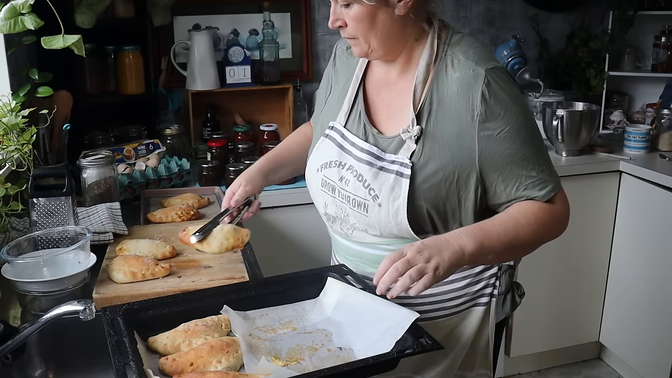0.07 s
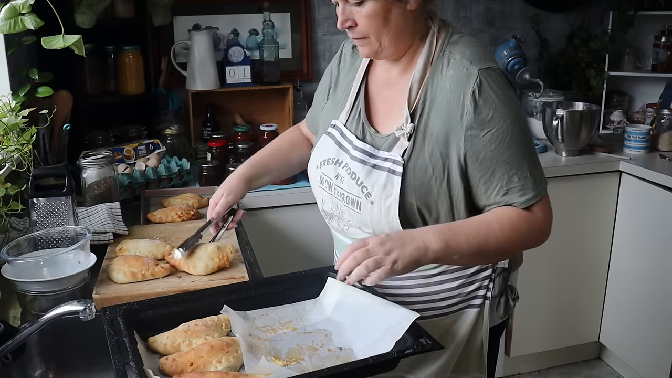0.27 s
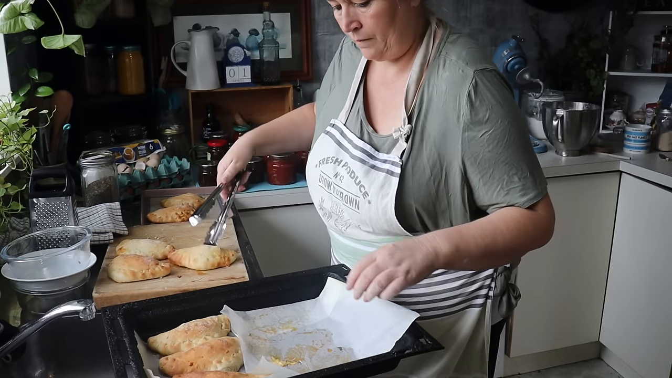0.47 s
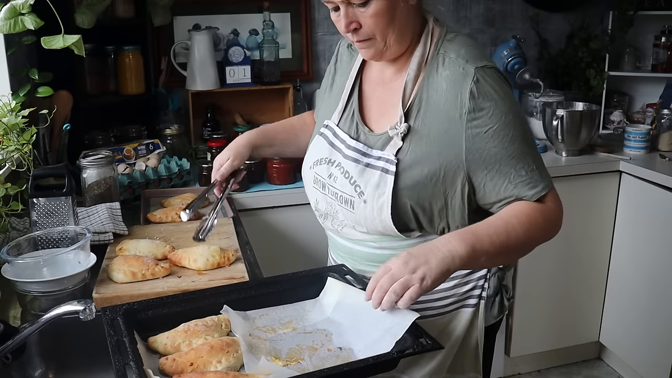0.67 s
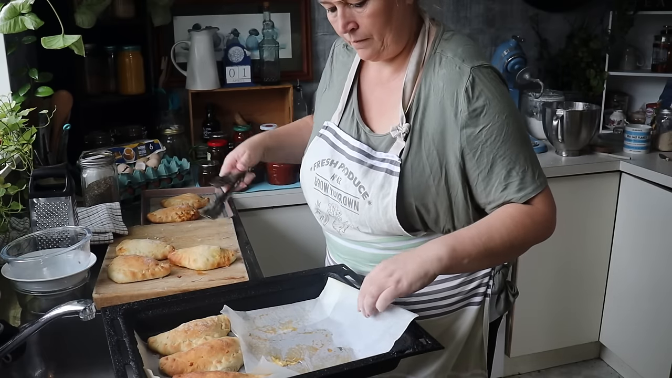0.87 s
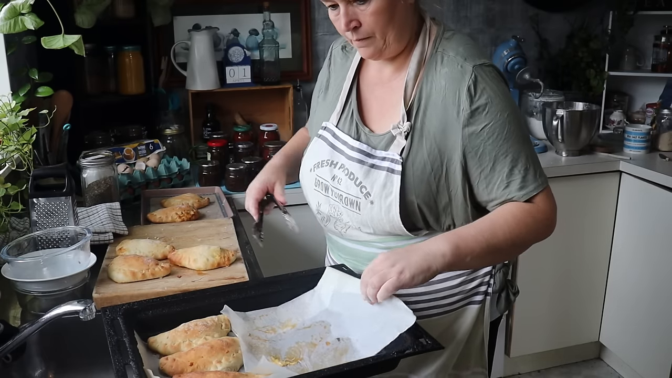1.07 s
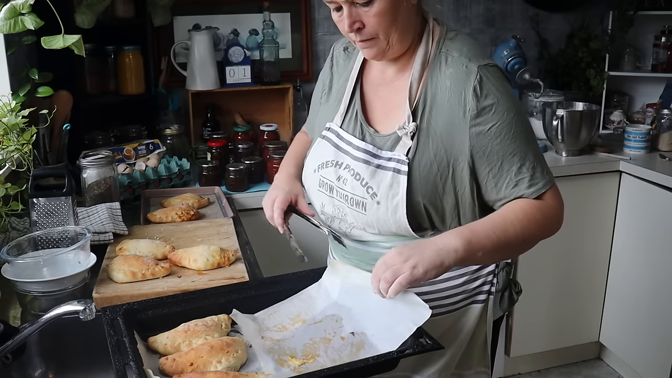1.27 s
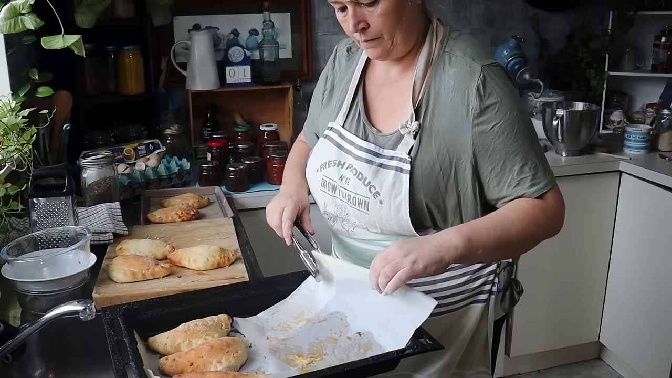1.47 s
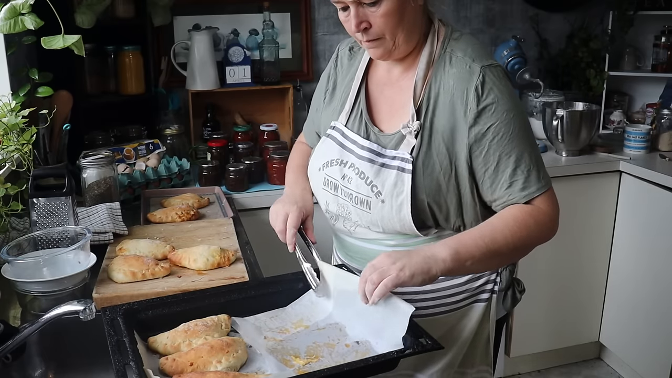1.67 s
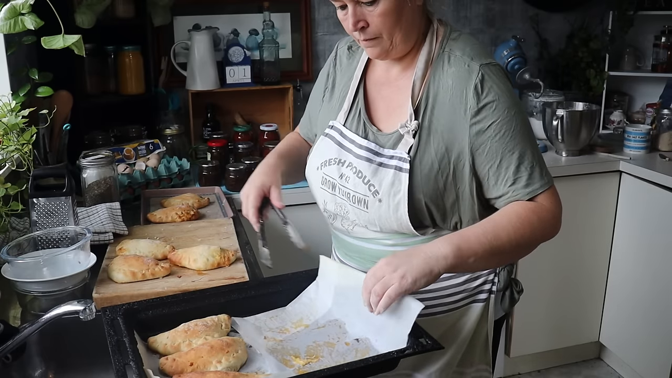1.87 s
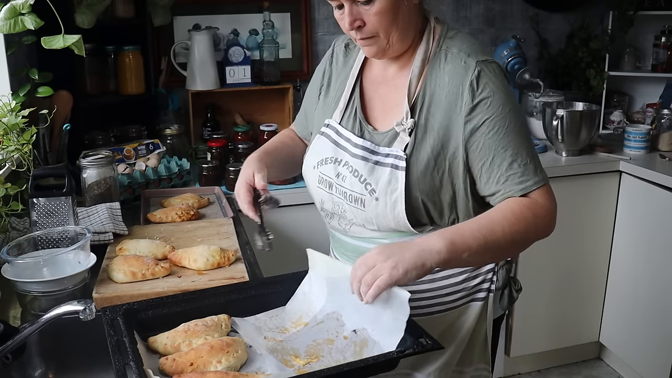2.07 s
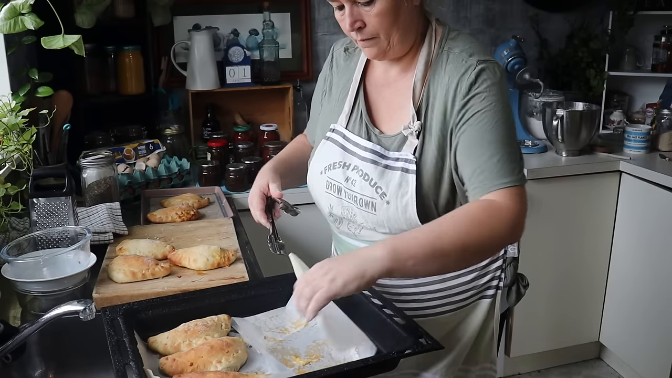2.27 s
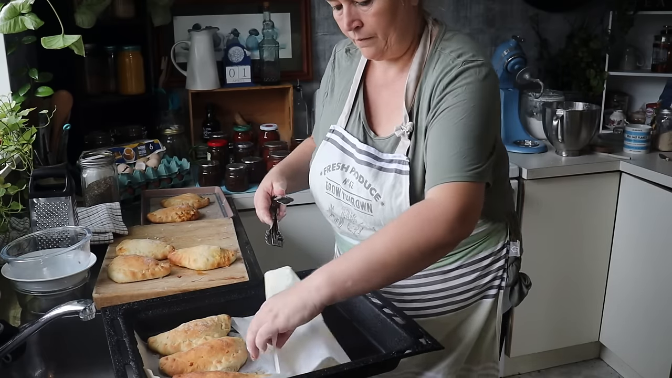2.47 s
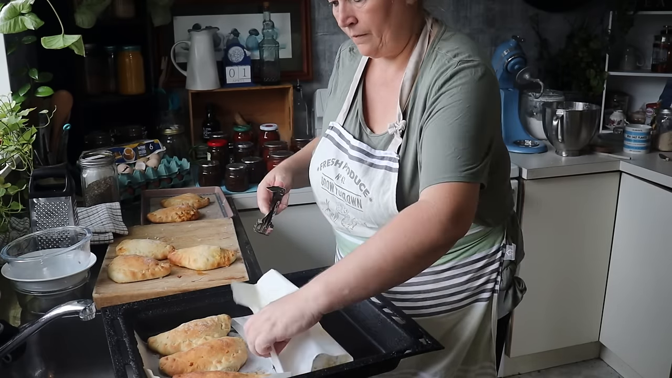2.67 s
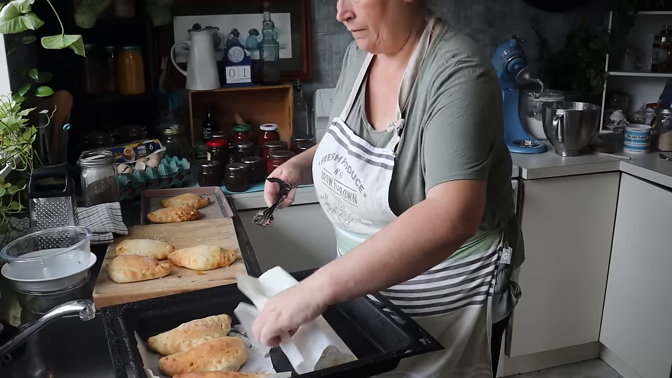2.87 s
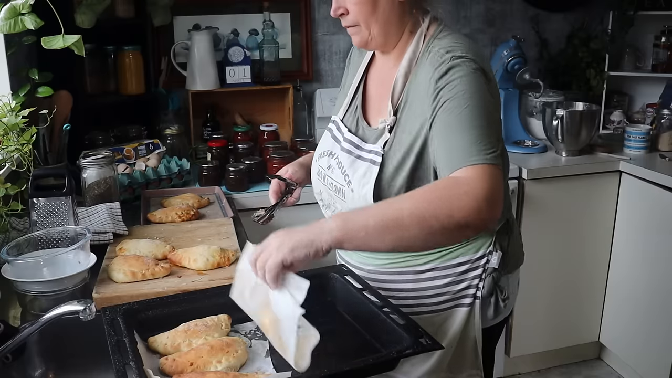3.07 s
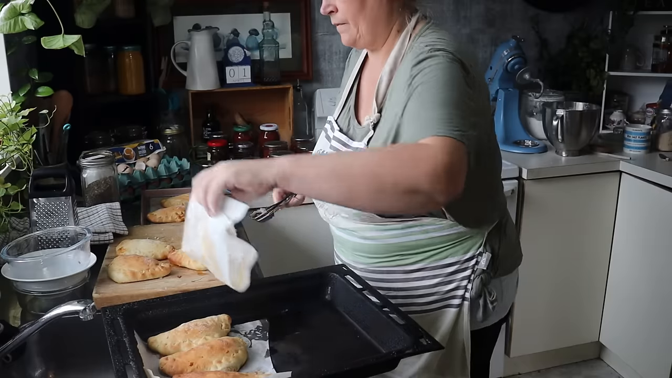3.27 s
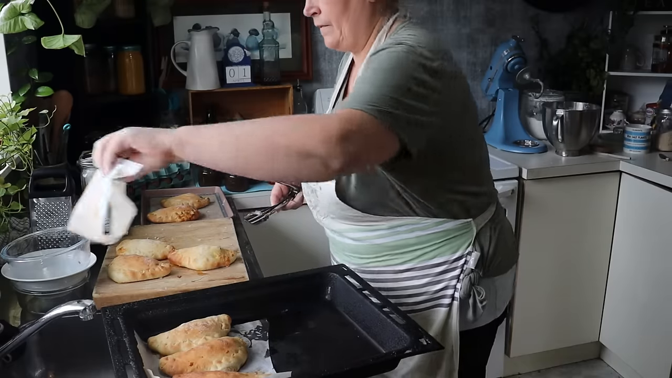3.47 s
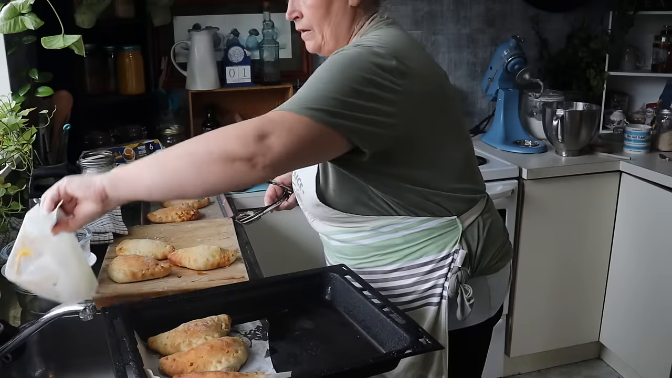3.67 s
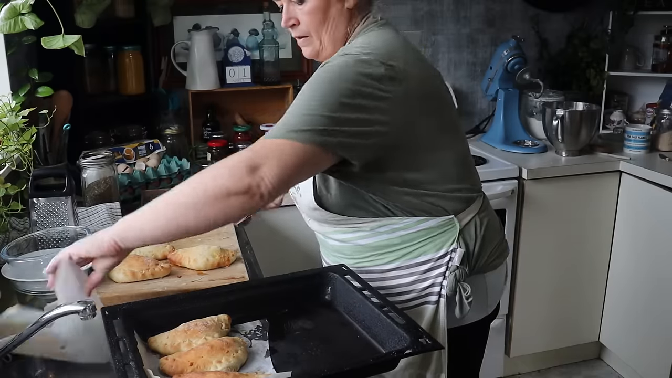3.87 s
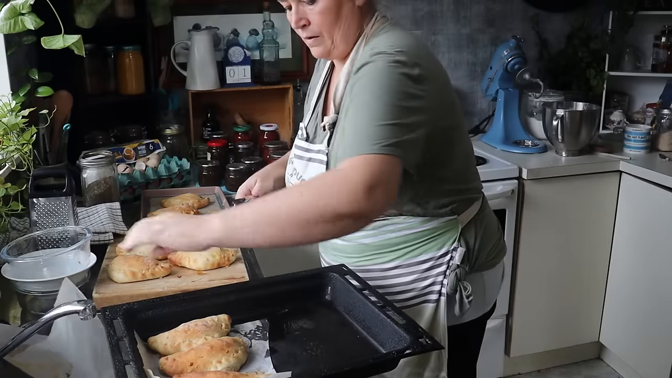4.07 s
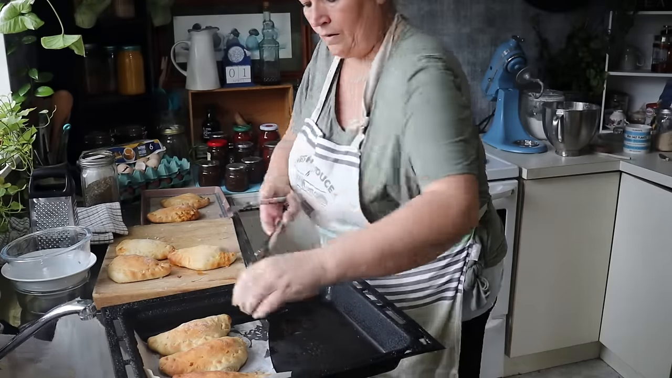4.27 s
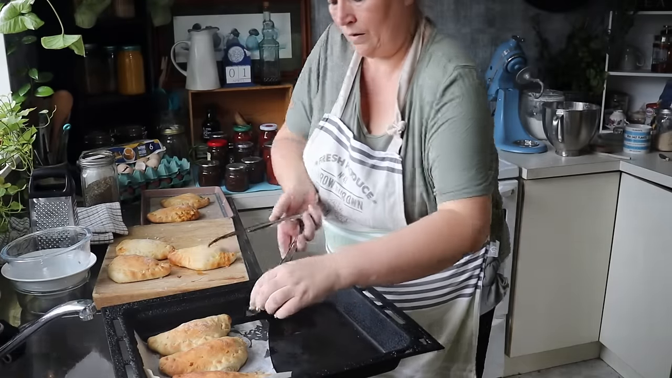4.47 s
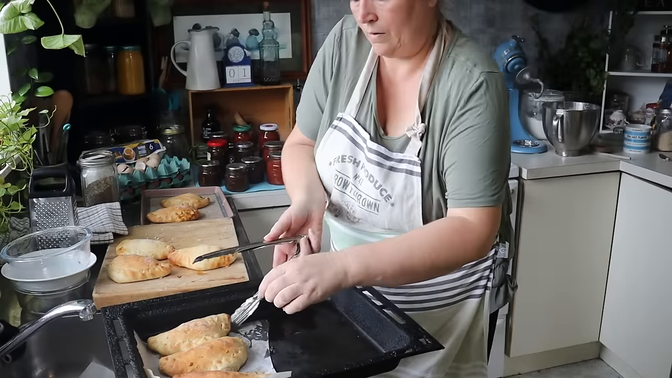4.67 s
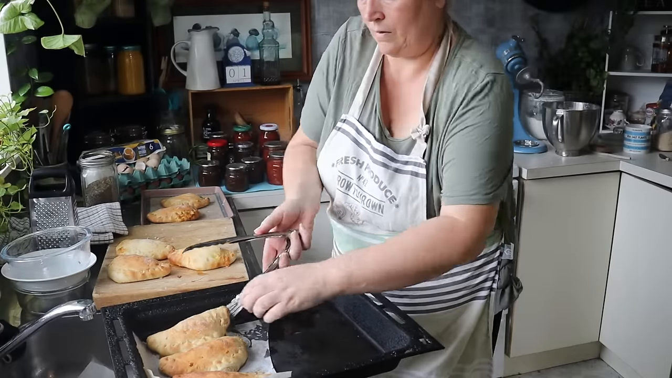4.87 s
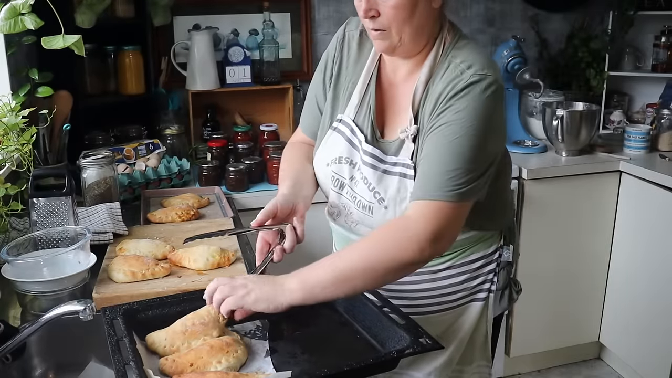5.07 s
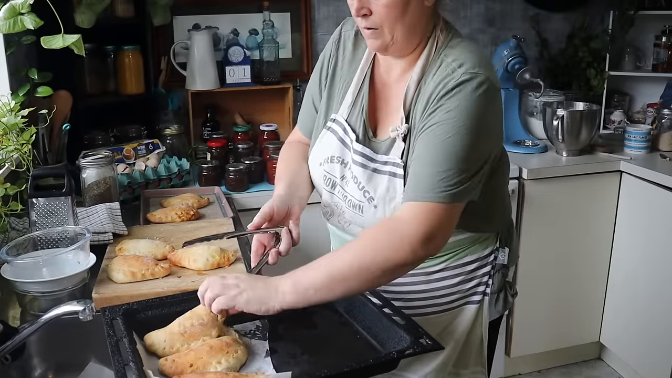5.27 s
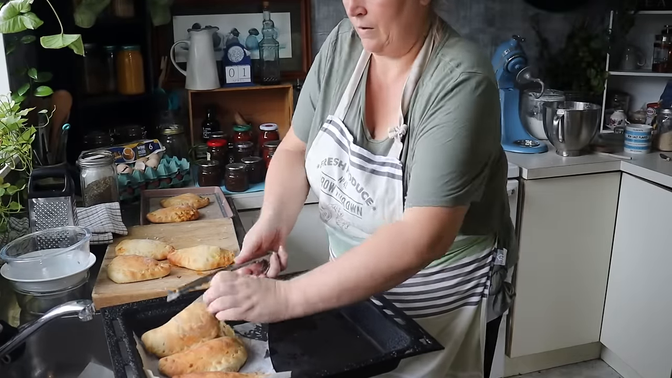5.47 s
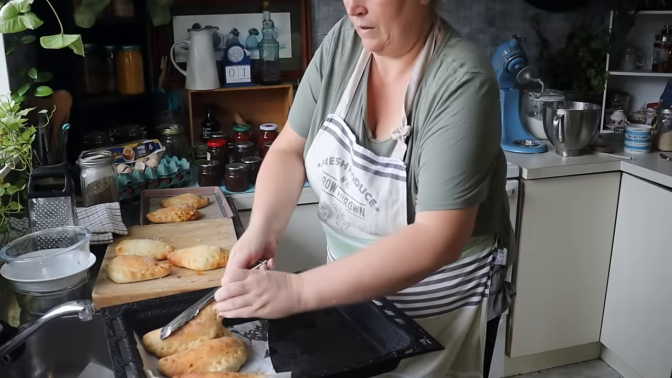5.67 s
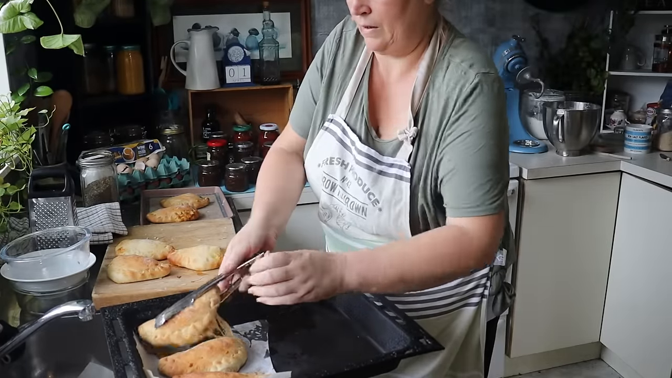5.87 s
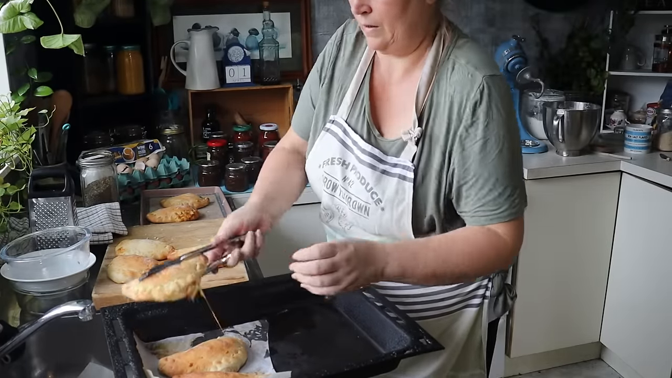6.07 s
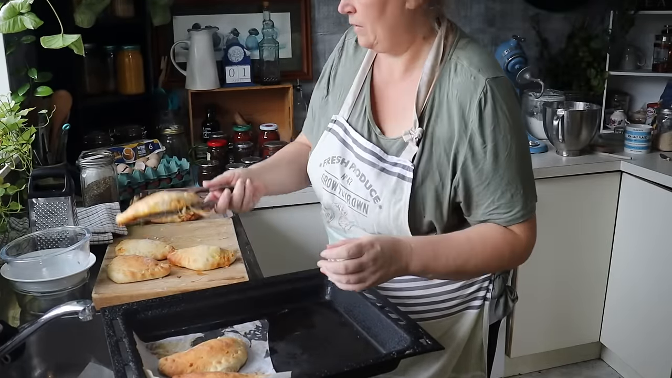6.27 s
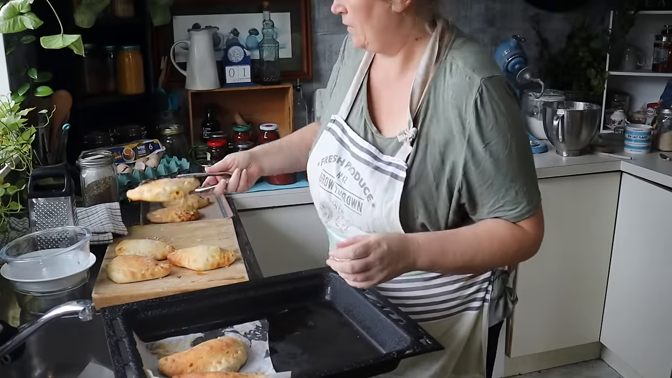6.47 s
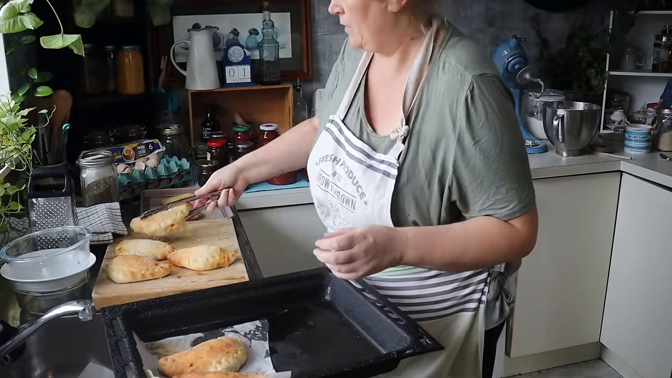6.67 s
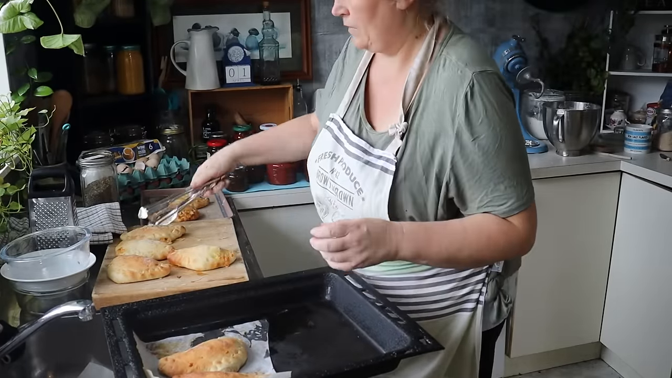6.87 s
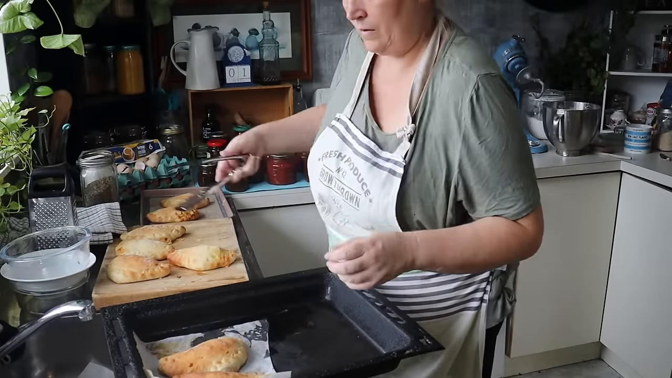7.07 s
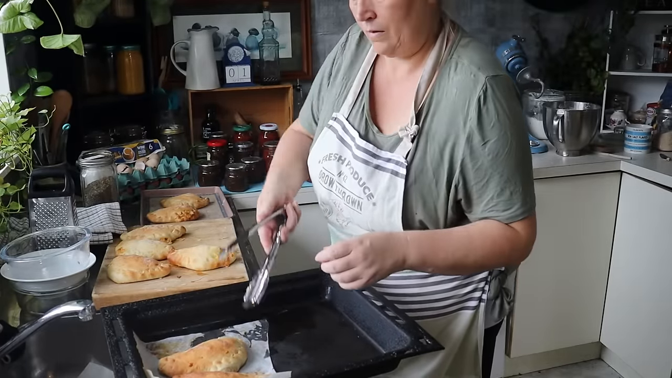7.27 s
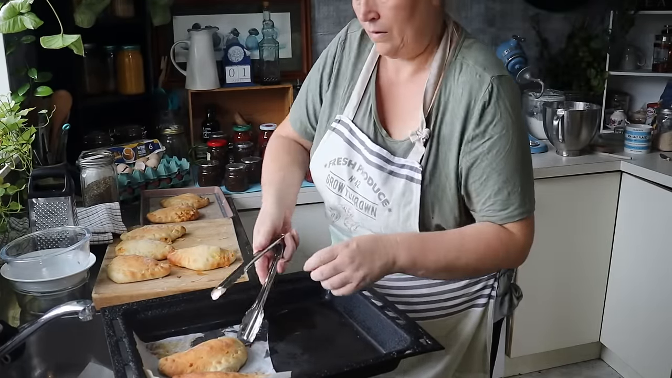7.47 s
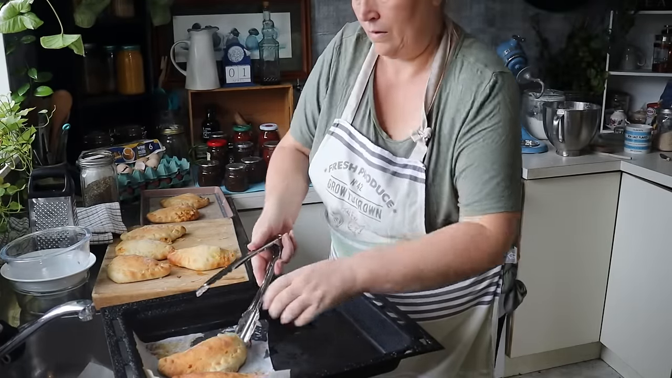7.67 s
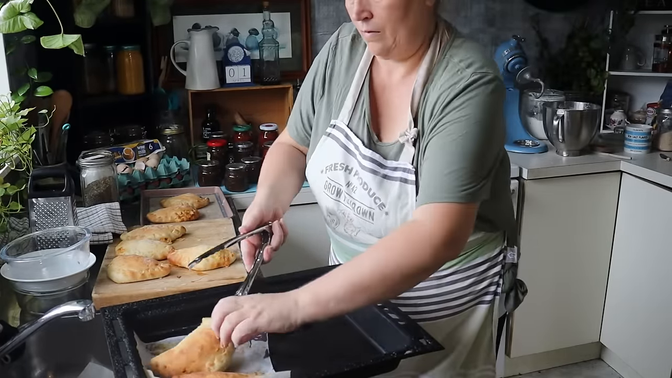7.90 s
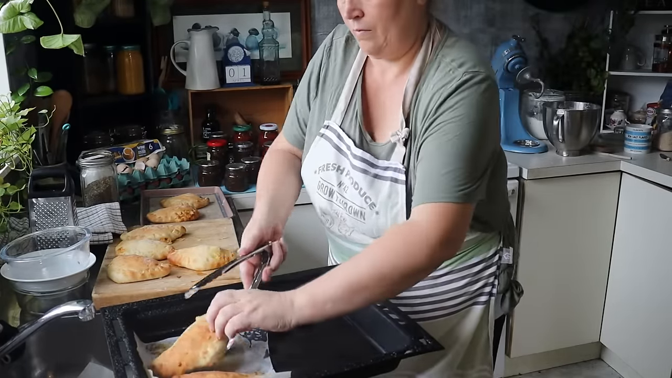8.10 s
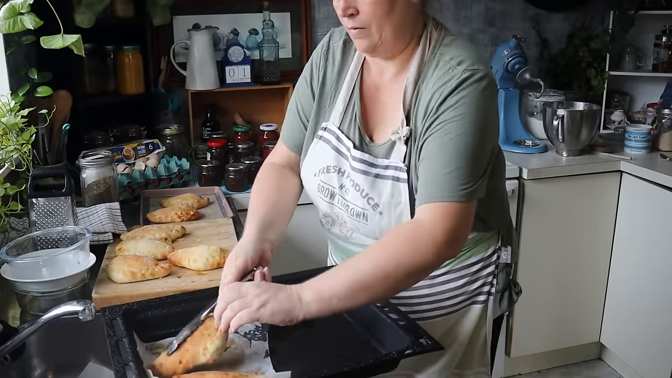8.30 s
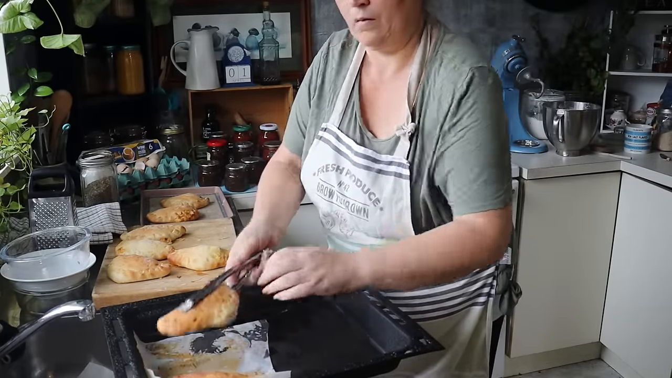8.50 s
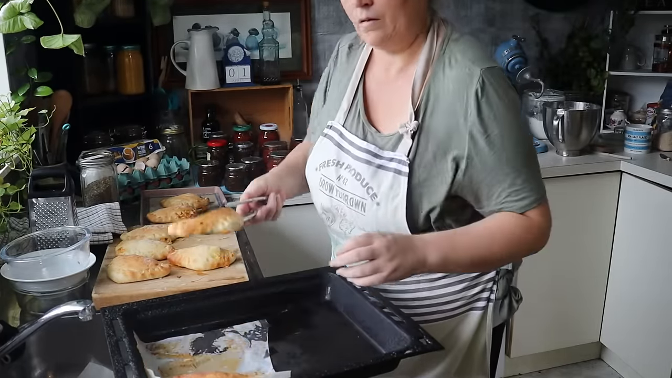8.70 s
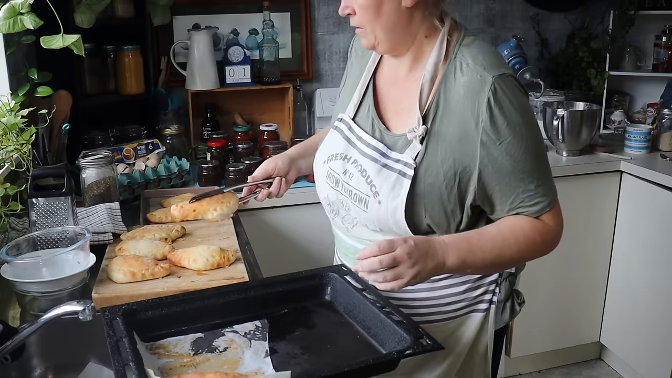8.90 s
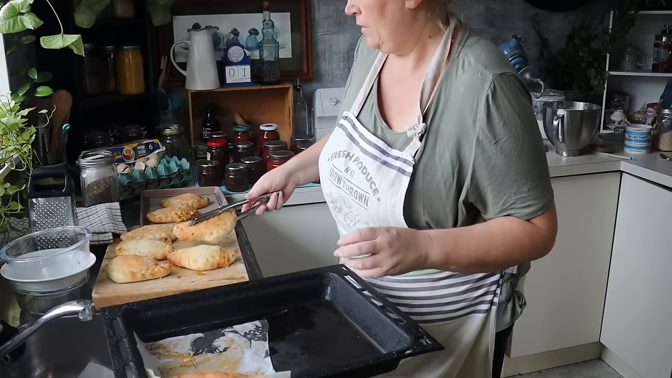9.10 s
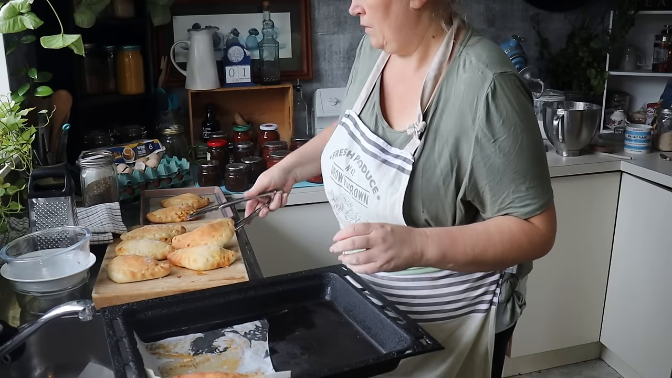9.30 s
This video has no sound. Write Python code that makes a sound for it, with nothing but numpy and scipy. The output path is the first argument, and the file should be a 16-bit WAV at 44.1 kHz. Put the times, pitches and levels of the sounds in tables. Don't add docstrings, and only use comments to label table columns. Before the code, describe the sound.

A small, lively kitchen heard close up in stereo. An oven fan blows steadily with a low hum, and outside a one-cylinder engine putters slowly, only its bass coming through the walls. At 0.35 s tongs clink brightly, with crust cracks and a light touch by 0.7 s. From 0.9 s baking paper crackles; 1.5-3.1 s it is peeled and crumpled in dense, sharp snaps, loudest around 1.65 and 2.45 s, with small hollow pops. Tearing and rustling continue at 3.3-4.9 s, with a strong rip near 4.05 s and dull tray flexing. At 5.3 s crust cracks and a faint clink; a thin steel scrape follows at 5.7 s. The engine revs from 5.4 s and drives away faster until the end. A scrape and solid crunchy knock land at 6.9-7.0 s, a ringing clink at 7.5 s, paper tears at 8.05 and 8.5 s, and a soft set-down at 9.3 s.

```python
import sys
import numpy as np
from scipy import signal
from scipy.fft import rfft, irfft, next_fast_len
from scipy.io import wavfile
from scipy.ndimage import uniform_filter1d

SR = 44100
rng = np.random.default_rng(int(sys.argv[2]) if len(sys.argv) > 2 else 0)


def transcribe(u):
    v = np.clip(np.atleast_2d(u).T, -1, 1)
    q = np.round(v * 32767).astype(np.int16)
    wavfile.write(sys.argv[1], SR, q)


def invert_db(level):
    return 10 ** (np.asarray(level, dtype=float) / 20)


N = 411894


def rms_one(x):
    return x / np.sqrt(np.mean(x ** 2) + 1e-20)


def in_time(rows, outside=None):
    s, *columns = np.transpose(rows)
    t = np.arange(N) / SR
    return [np.interp(t, s, column, outside, outside) for column in columns]


def at_hz(points, hz):
    table = np.array(points)
    return np.interp(np.log(np.maximum(hz, 1)), np.log(table[:, 0]), table[:, 1])


def drift(rate, size=1):
    knots = rng.standard_normal(400)
    return np.interp(np.arange(0, N, size) / SR * rate, np.arange(400), knots)


def ring(clicks, hz, t60):
    r = invert_db(-60 / (t60 * SR))
    w = 2 * np.pi * min(hz, .45 * SR) / SR
    return signal.lfilter([0, np.sin(w)], [1, -2 * r * np.cos(w), r * r], clicks + 1e-18)


def struck(clicks, modes, longest=9):
    return sum(invert_db(db) * ring(clicks, hz, min(t60, longest)) for hz, db, t60 in modes)


def grains(per_s, spread_db, n=N):
    sizes = invert_db(spread_db * np.minimum(rng.exponential(1, n), 5))
    signed = sizes * rng.choice([-1, 1], n)
    return signed * (rng.random(n) < per_s / SR)


def moves(rows, rest_db):
    t = np.arange(0, N + 32, 32) / SR
    s, db, rise, fade = np.transpose(rows)[:, :, None]
    each = db - 20 * np.maximum((s - t) / rise, (t - s) / fade)
    leading = np.maximum(each.max(axis=0), rest_db)
    return np.interp(np.arange(N) / SR, t, leading)


def wide(mid, side, hz):
    side = signal.sosfilt(signal.butter(1, hz, "high", fs=SR, output="sos"), side)
    return np.array([mid + side, mid - side])


# f/Hz, level/dB per Hz
FAN_AIR = [(50, 3.5), (150, 6.5), (230, -11.5), (350, 0), (700, -8.5), (1200, -6.5), (2000, -8.5),
           (2600, -10), (4900, -21), (8000, -30), (14000, -30), (15600, -23)]
# f/Hz, width/Hz, level/dB rms
FAN_CASING = [(275.4, 9.4, -65), (519, 11, -61), (998, 6.9, -63.5), (1147, 34, -61.5), (1270, 50, -62.5),
              (1605, 45, -64.5), (1880, 71, -62.5)]


def fan():
    size = next_fast_len(N)
    hz = np.arange(size // 2 + 1) * SR / size
    white = rng.standard_normal((4, N))
    air = irfft(rfft(white[:2], size) * invert_db(at_hz(FAN_AIR, hz)), size)[:, :N]
    air = invert_db(-50.5) * air / np.std(air[0])
    hums = 0
    for f, width, db in FAN_CASING:
        hums = hums + invert_db(db) * np.array([rms_one(ring(w, f, 2.85 / width)) for w in white[2:]])
    motor_hz, motor_db = 167.3, -53.5
    motor = invert_db(motor_db + 0.48 * drift(1.0)) * np.sin(2 * np.pi * motor_hz * np.arange(N) / SR)
    return wide(*(air + hums), hz=1070) + motor


# t/s, firing rate f/Hz
ENGINE_SPEED = [
    (0, 10.849),
    (.5, 10.27),
    (5.25, 10.445),
    (5.45, 12.295),
    (5.65, 14.856),
    (5.85, 15.298),
                (6.0, 16.8),
    (6.27, 18.3),
    (6.46, 17.5),
    (6.72, 17.1),
    (6.96, 20.4),
    (7.24, 21.9),
    (8.08, 22.4),
    (8.78, 24.0),
    (9.34, 24.7),
]
# t/s, tailpipe level/dB
ENGINE_EFFORT = [(0, -48), (5.3, -49), (5.46, -44.5), (6.14, -39.5), (6.4, -43), (7.08, -38), (7.22, -40.5),
                 (8.11, -37), (8.25, -41), (8.43, -39), (8.71, -44), (9.03, -38.5), (9.34, -38.5)]
# firing rate f/Hz, header and silencer level/dB against the tailpipe
EXHAUST_BALANCE = [(10.7, 5.5, -4), (12.5, -12, -1.5), (15.9, -12, -2), (17.4, 0.5, -14), (19, -5.5, -19),
                   (21.9, -17, -27), (25, -9, -16)]
# f/Hz, level/dB, t60/s
TAILPIPE = [(109.2, 4.5, 0.42), (115.8, 5, 0.3), (121, -19, 0.31), (142, -5, .18), (187, -4.5, 0.13),
            (227.5, -12, 0.15)]
# f/Hz, level/dB, t60/s
HEADER_PIPE = [(77.4, 7, 0.066), (96.8, -2, 0.14)]
# f/Hz, level/dB, t60/s
SILENCER = [(215, -6, .12), (52.7, -3, 0.17), (58.5, -1, 0.54), (76, 3, 0.14)]


def engine():
    speed = in_time(ENGINE_SPEED)[0]
    turns = -0.1077 + np.cumsum(speed) / SR
    fired = np.flatnonzero(np.diff(np.floor(turns)))
    luck = rng.standard_normal((200, 2))[:len(fired)] * (10 / speed[fired, None]) ** 2
    late = (.0012 * SR * luck[:, 0]).astype(int)
    pulses = np.zeros(N)
    pulses[np.clip(fired + late, 0, N - 1)] = -invert_db(0.5 * luck[:, 1])
    evened = pulses / np.sqrt(speed)
    rate, *shares = np.transpose(EXHAUST_BALANCE)
    header_db, boom_db = (np.interp(speed, rate, db) for db in shares)
    pipe_db = in_time(ENGINE_EFFORT)[0]
    pipe, header, boom = (rms_one(struck(evened, modes)) for modes in (TAILPIPE, HEADER_PIPE, SILENCER))
    out = invert_db(pipe_db) * (pipe - invert_db(header_db) * header + invert_db(boom_db) * boom)
    return signal.sosfilt(signal.butter(3, [41, 260], "band", fs=SR, output="sos"), out)


# t/s, peak level/dB
LANDINGS = [(0.344, -47), (0.527, -36), (5.299, -43.5), (5.7, -39), (5.93, -45), (6.336, -49), (6.884, -37),
            (6.984, -24.5), (7.466, -28), (8.044, -45), (8.412, -34), (8.493, -43), (9.305, -37)]
# t/s, peak level/dB, time to rise 20 dB/s, time to fade 20 dB/s
TRAY_NUDGES = [
    (3.614, -44.5, 0.06, .26),
    (3.738, -40.5, .05, .06),
    (3.924, -37, 0.01, 0.18),
    (4.068, -32, 0.26, 0.13),
    (4.258, -53, 0.2, 1.2),
    (4.5, -35.5, 0.05, .3),
    (4.57, -36, 0.12, 0.1),
    (4.752, -44, 0.1, 0.66),
]
# f/Hz, level/dB, t60/s
TRAY_TONES = [(232, -66, 0.026), (260, 0.5, 0.08), (285, 5, 0.11), (322, 0, 0.1), (454.5, 1.5, 0.093),
              (695, -3.5, 0.03)]


def tray():
    pushes = np.zeros(N)
    pushes[[round(s * SR) for s, db in LANDINGS]] = invert_db(np.array(LANDINGS)[:, 1] - 6.5)
    rumble = invert_db(moves(TRAY_NUDGES, rest_db=-120) + 2.0) * rms_one(struck(grains(300, 3.0), TRAY_TONES))
    out = struck(pushes, TRAY_TONES) + rumble
    return signal.sosfilt(signal.butter(2, 190, "high", fs=SR, output="sos"), out)


# t/s, peak level/dB
TONG_TOUCHES = [
    (0.3451, -12),
    (0.7191, -22),
    (5.3163, -24),
    (6.9835, -20),
    (7.4667, -12.5),
]
# f/Hz, level/dB, t60/s (played at most 0.055 long)
TONG_RINGS = [
    [(2930, 2, .09), (2800, -2, .04), (4550, 3, 0.086), (5370, -8, .03), (6480, 3, 0.025),
     (6800, -4, 0.037)],
    [(3050, -24, .06), (4380, 4.5, 0.13), (4560, 1, .04), (5620, 2, 0.082), (6880, 3.5, .06),
     (7700, 1, .06), (10300, 2, 0.04)],
    [(5560, 3, 0.028), (5800, 1, 0.038), (7760, 2, 0.041), (9000, -10, .06), (10310, -5, .08)],
    [(510, 2.5, 0.033), (940, 2, 0.032), (1450, 10, 0.041), (1600, 18.5, 0.025), (2230, -1, 0.058),
     (3100, 0, 0.061)],
    [(1010, -2, 0.19), (1250, -2, 0.077), (1880, -1.5, 0.14), (2100, -4, .05), (3050, -14, 0.044),
     (3750, -3, 0.035), (4400, -4, 0.03), (5730, -2, 0.04), (7560, -4, 0.033)],
]


def tongs():
    out, t = np.zeros(N), np.arange(12000) / SR
    for (s, db), modes in zip(TONG_TOUCHES, TONG_RINGS):
        i = round(s * SR)
        contact = .35 * grains(1200, 3.0, len(t)) * np.exp(-t / .02)
        contact[0] = 1
        crack = 2.2 * rng.standard_normal(len(t)) * np.exp(-t / 0.004)
        out[i:i + len(t)] += invert_db(db - 12.0) * (struck(contact, modes, longest=.055) + crack)
    return out


# f/Hz, level/dB per Hz
PAPER_COLOUR = [(210, -44), (350, -1), (430, -4.5), (738, 2.5), (878, -5.5), (1350, 0.5), (4030, 3.5),
                (4950, 3), (15500, -6.5)]
# t/s, slack low-tone level/dB, crisp high-tone level/dB
PAPER_GRIP = [(.35, -30, -10.5), (.6, -3, -5), (1.03, -38, -7), (1.6, -17, -10), (2.3, -18, -7.5),
              (2.9, -11, -11), (3.95, -10, -5.5), (4.7, -16.5, -8), (5.3, 0.5, -8.5), (5.75, -15, -3),
              (6.3, -9.5, -13.5), (6.9, -22, -10), (7.0, -4, -23), (7.4, -26, -11.5), (7.88, -12, -12.5),
              (8.05, -13.5, 1.5), (8.51, -9, 0.5), (9.3, -15, -30)]
# t/s, peak level/dB, time to fade 20 dB/s
PAPER_TUGS = [(.349, -24.5, 0.0253), (.36, -35, 0.29), (.528, -39.5, 0), (.722, -38.5, 0.16),
              (.93, -43, .6), (1.005, -29, .28), (1.209, -37, 0.8), (1.842, -33.5, 0.8),
              (1.998, -22.5, .055), (2.086, -32, 0.15), (2.345, -22.5, .1), (2.468, -26.5, .15),
              (2.66, -27.5, 0.43), (3.517, -31, 0.04), (4.06, -20.5, 0.16), (4.255, -30, .11),
              (4.385, -34.5, 0.5453), (4.584, -27, .28), (4.719, -22.5, .15), (4.879, -38.5, .15),
              (5.57, -45.5, 0.13), (5.672, -34.5, .3), (6.343, -36.5, 0.04), (6.99, -32, 0.02),
              (7.472, -29, .07), (7.5, -36, 0.24), (8.053, -33, 0.2241), (8.393, -40.5, 0.2),
              (8.49, -33.5, 0.09), (9.272, -48, .3), (9.306, -33, .06)]
# t/s, peak level/dB, time to rise 20 dB/s, time to fade 20 dB/s
PAPER_PULLS = [
    (1.66, -21, 0.1449, 0.18),
    (2.79, -26, .6, .45),
    (2.385, -22, 0.12, 0.19),
    (3.163, -25, 1.1, 0.11),
    (3.332, -38.5, 0.8, 0.26),
    (3.654, -35.5, .3, 0.17),
    (3.95, -21, 0.1032, 0.33),
    (5.31, -51.5, .3, 0.2),
    (6.886, -29, .07, 0.1854),
    (7.98, -39.5, 0.19, 0.32),
]


def paper():
    tug_rise_s = 0.009
    tugs = [(s, db, tug_rise_s, fade) for s, db, fade in PAPER_TUGS]
    level_db = moves(PAPER_PULLS + tugs, rest_db=-69)
    body_db, crisp_db = np.array(in_time(PAPER_GRIP))[:, ::16]
    ticking = grains(3500 * invert_db(4.0 * drift(40.0)), spread_db=3.2)
    dealt = rng.integers(0, 3, N)
    out = 0
    for k, hz in enumerate(np.geomspace(450, 15500, 24)):
        low = np.interp(np.log(hz), np.log([900, 1700]), [1, 0])
        high = np.interp(np.log(hz), np.log([5000, 9000]), [0, 1])
        colour_db = low * (body_db + 11.0) + high * (crisp_db + 7.0) + 2.82 * drift(22.0, size=16)
        gain = invert_db(at_hz(PAPER_COLOUR, hz) + colour_db).repeat(16)[:N]
        panel = rms_one(ring(ticking * (dealt == k % 3), hz, 7 / hz))
        out = out + (-1) ** (k // 3) * panel * np.sqrt(hz) * gain
    out = invert_db(level_db - 43.4) * out
    return signal.sosfilt(signal.butter(4, 520, "high", fs=SR, output="sos"), out)


def snaps(rows):
    out, t = np.zeros(N), np.arange(5000) / SR
    broad = signal.butter(2, [900, 9400], "band", fs=SR, output="sos")
    bright = signal.butter(2, [8500, 16000], "band", fs=SR, output="sos")
    swell = 1 - np.exp(-t / .0006)
    for s, db, hz, length, edge_db in sorted(rows):
        i = round(s * SR)
        fade = np.exp(-t / np.clip(length / 3, .001, .03))
        burst = grains(15000, 2.5, len(t)) * fade * swell
        burst[0] += 5
        panel = .2 * np.sqrt(min(hz / 3500, 1)) * ring(burst, hz, 12 / hz)
        edge = invert_db(edge_db + 1.0) * signal.sosfilt(bright, burst)
        crack = signal.sosfilt(broad, burst) + panel - edge
        out[i:i + len(t)] += (invert_db(db + 1.0) * crack / np.abs(crack).max())[:N - i]
    return out


# t/s, peak level/dB, panel f/Hz
FOLD_TICKS = [(0.4544, -25, 7720), (1.011, -16, 3600), (1.1167, -21, 5490), (1.419, -27, 4590),
              (1.5418, -24, 1850), (1.5832, -17, 3280), (1.6544, -7, 4140), (1.7254, -14, 4100),
              (1.8381, -18, 3690), (1.9344, -21, 7470), (2.0034, -17, 4540), (2.0844, -19, 2340),
              (2.1894, -24, 2230), (2.3844, -8, 3470), (2.5391, -13, 3780), (2.7645, -13, 4490),
              (2.7994, -15, 4090), (2.8444, -16, 3900), (2.9137, -13, 3690), (2.9394, -15, 3430),
              (3.0544, -15, 3770), (3.3756, -27, 1400), (3.5128, -15, 6920), (3.8715, -24, 4100),
              (3.9394, -13, 1890), (3.9694, -9, 3410), (4.0556, -8, 1390), (4.0944, -10, 2140),
              (4.2182, -23, 1920), (4.583, -13, 2370), (4.722, -13, 1920), (4.7694, -17, 1440),
              (4.8194, -20, 5300), (6.8834, -18, 4100), (6.9494, -21, 4850)]


def ticks():
    length_s, edge_db = .014, -10
    return snaps([(s, db + 6.0, hz, length_s, edge_db) for s, db, hz in FOLD_TICKS])


# t/s, peak level/dB, flake f/Hz
CRUST_CRACKS = [(.524, -16, 4530), (.717, -25, 6900), (5.21, -30, 1100), (5.303, -19, 6000),
                (5.5615, -29.5, 1010), (5.661, -18, 6100), (5.931, -21.5, 1100), (6.334, -16, 4800),
                (6.854, -33, 4670), (6.871, -25, 4100), (6.9835, -8, 2900), (7.869, -16, 5500),
                (7.953, -21.5, 2820), (7.97, -18.5, 1840), (8.388, -18, 4700), (9.2695, -26, 1650),
                (9.301, -20.5, 2120)]


def crust():
    length_s, edge_db = .034, -22
    return snaps([(*row, length_s, edge_db) for row in CRUST_CRACKS])


# t/s, peak level/dB, panel f/Hz, length/s
PAPER_CREASES = [(.9256, -20.5, 3900, .03), (1.001, -11.5, 4070, .062), (1.182, -12, 3520, .019),
                 (1.208, -8.5, 3250, .044), (1.526, -23, 3300, .03), (1.5693, -14, 3800, .03),
                 (1.609, -5.5, 3660, 0.074), (1.637, -3, 3900, .085), (1.6711, 0, 4160, .012),
                 (1.839, -11.5, 3870, 0.025), (1.876, -18, 3670, 0.027), (2.066, -8, 4080, .03),
                 (2.123, -11, 3400, 0.03), (2.154, -10, 1580, .012), (2.298, -8, 3580, 0.04),
                 (2.4631, 1, 3450, .022), (2.5397, -3, 3770, 0.053), (2.655, -10, 3400, 0.043),
                 (2.744, -3, 2420, .015), (2.8254, -4.5, 3450, .09), (3.582, -14, 1760, .08),
                 (3.159, -6, 2300, .02), (3.895, -12, 2180, 0.066), (4.381, -19, 4000, .03),
                 (4.565, -11, 2600, .07), (4.6573, -8, 2010, .037)]


def creases():
    return snaps([(s, db, hz, length, -32 - .4 * db) for s, db, hz, length in PAPER_CREASES])


# t/s, peak level/dB, f/Hz
BELLY_POPS = [(1.536, -34, 721), (1.585, -30, 713), (1.618, -30, 571), (1.726, -30, 533), (1.897, -38, 533),
              (2.466, -24, 786), (2.705, -31, 791), (2.795, -31, 942), (2.842, -27, 797), (3.026, -28, 654),
              (3.049, -27, 646)]


def pops():
    out, push = np.zeros(N), np.zeros(3000)
    push[:24] = np.hanning(24) / 12
    for s, db, hz in BELLY_POPS:
        i = round(s * SR)
        out[i:i + len(push)] += invert_db(db + 1.5) * ring(push, hz, t60=.022)
    return out


# t/s, peak level/dB, panel f/Hz, length/s
STUCK_SPOTS = [(1.9914, -4, 3800, .029), (2.3426, -0.5, 3300, 0.051), (3.287, -10, 2020, 0.015),
               (3.328, -9, 3900, .025), (3.499, -5, 7500, .027), (3.652, -12, 3100, 0.036),
               (3.802, -17, 1940, .018), (4.056, 0.5, 1270, 0.048), (4.246, -6.5, 2160, .027),
               (4.483, -16, 2170, 0.07), (4.874, -9, 1500, 0.025), (6.82, -38, 1130, .026),
               (7.4655, -8.5, 1290, .014), (8.049, -3.5, 5000, 0.039), (8.486, -12, 5540, .021)]


def tears():
    edge_db = 0
    return snaps([(*row, edge_db) for row in STUCK_SPOTS])


# t/s, level/dB
TONG_DRAGS = [
    [(5.64, -47), (5.684, -27), (5.778, -29.5), (5.86, -57)],
    [(6.83, -54), (6.878, -25), (6.925, -29), (6.95, -28), (6.99, -39)],
]
# f/Hz, width/Hz (played at least 450 wide), level/dB
DRAG_TONES = [
    [(3550, 37, -32), (5870, 190, 12), (7170, 79, 7), (8100, 32, -7), (8840, 65, 1.5), (12700, 41, -10)],
    [(2150, 100, -4), (3800, 98, 4), (4950, 98, 6), (5700, 65, 3), (6860, 67, -10), (8330, 56, -9),
     (11600, 220, -18)],
]


def drags():
    out = 0
    for rows, peaks in zip(TONG_DRAGS, DRAG_TONES):
        slips = grains(3000, 4.0)
        arms = sum(invert_db(db) * rms_one(ring(slips, hz, 2.2 / max(width, 450))) for hz, width, db in peaks)
        out = out + invert_db(in_time(rows, outside=-120)[0] - 1.0) * rms_one(arms)
    return out


# f/Hz, t60/s
KITCHEN_DECAY = [(250, 0.32), (1000, .4), (4000, 0.23), (12000, 0.16)]


def echoes():
    t = np.arange(SR // 2) / SR
    white = rng.standard_normal((2, 2, len(t)))
    late = 0
    for low in 125 * 2. ** np.arange(7):
        band = signal.sosfilt(signal.butter(2, [low, 2 * low], "band", fs=SR, output="sos"), white[0])
        t60 = at_hz(KITCHEN_DECAY, np.sqrt(2) * low)
        late = band * invert_db(-60 * t / t60) - late
    early = white[1] * np.exp(-t / .012)
    late = late * np.clip(t / .01, 0, 1)
    both = invert_db(-6) * rms_one(early) + invert_db(-7.5) * rms_one(late)
    out = wide(*both, hz=1030) / np.sqrt(2 * len(t))
    out[[0, 1], rng.integers(0, 9, 2)] += invert_db(-4.5)
    return out


def kitchen():
    places = 6
    spot = rng.integers(0, places, N // 1764 + 1).repeat(1764)[:N]
    spots = []
    for k in range(places):
        share = np.sqrt(np.clip(uniform_filter1d(1. * (spot == k), size=600), 0, 1))
        spots.append((share, echoes()))
    return spots


def scene():
    air, street = fan(), engine()
    close = tray() + tongs() + paper() + ticks() + crust() + creases() + pops() + tears() + drags()
    size = next_fast_len(N + SR // 2)
    heard = sum(rfft(share * close, size) * rfft(paths, size) for share, paths in kitchen())
    room = irfft(heard, size)[:, :N]
    askew = invert_db(-23.0) * np.roll(street, 110) * [[1], [-1]]
    left, right = room + air + askew + street * invert_db(np.array([[.4], [-.4]]))
    return np.array([left, np.roll(right, 1)])


def band_limit(x):
    return signal.sosfilt(signal.butter(12, 16650, fs=SR, output="sos"), x)


def record(dry):
    cut = signal.sosfilt(signal.butter(3, 48, "high", fs=SR, output="sos"), dry)
    cut = signal.sosfilt(signal.ellip(10, .5, 33, 15850, fs=SR, output="sos"), cut)
    mix = 0.92 * np.tanh(cut / 0.88)
    return band_limit(mix)


dry = scene()
out = record(dry)
transcribe(out)
```